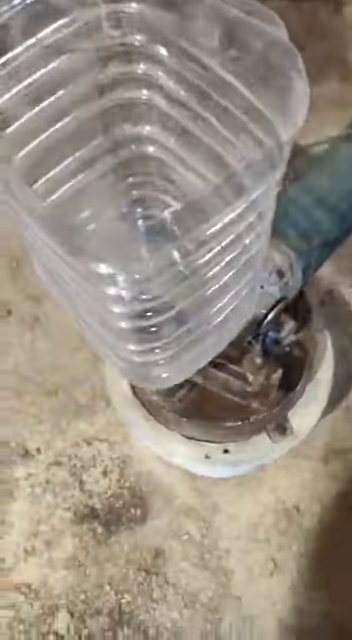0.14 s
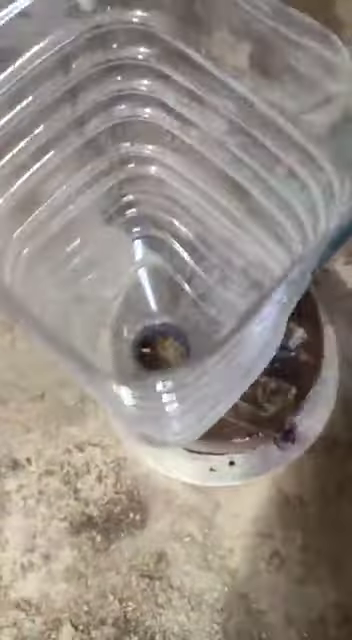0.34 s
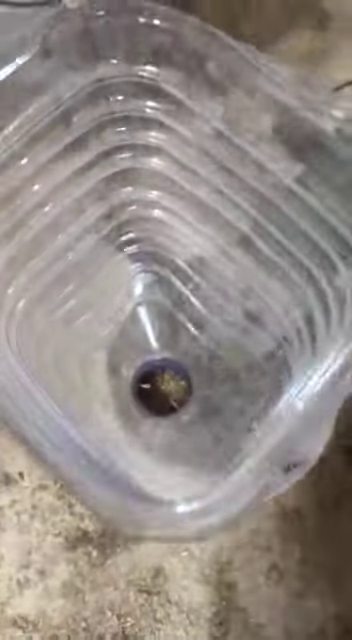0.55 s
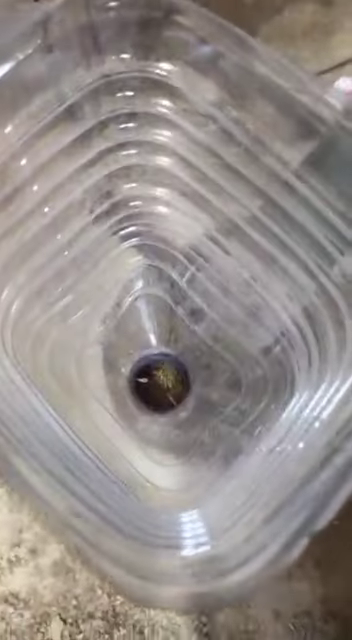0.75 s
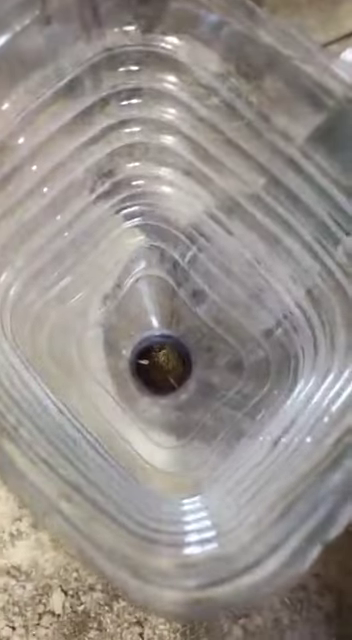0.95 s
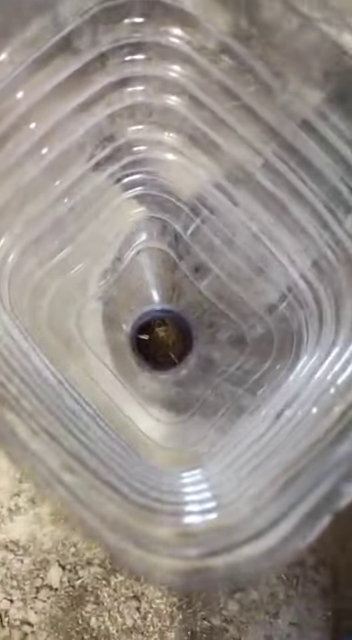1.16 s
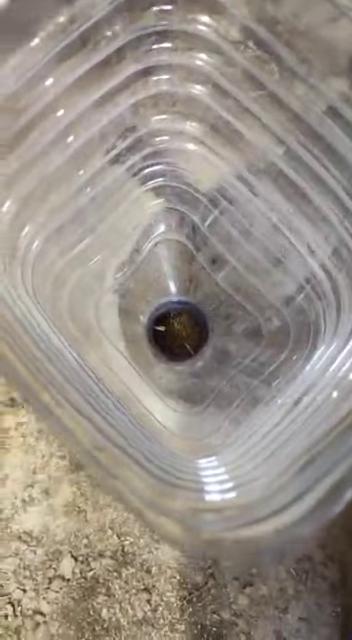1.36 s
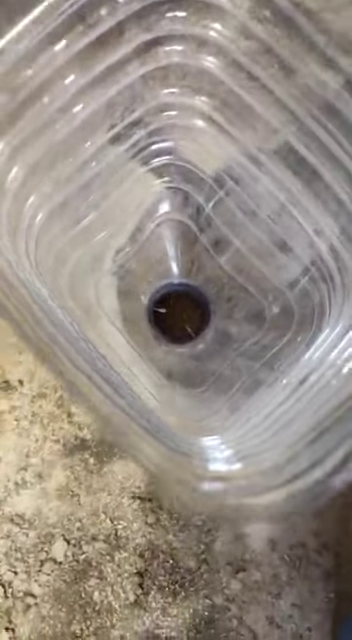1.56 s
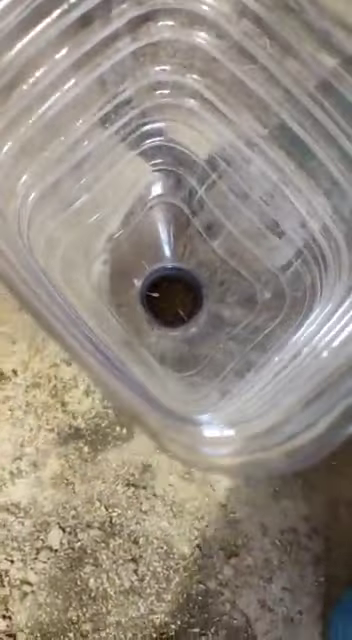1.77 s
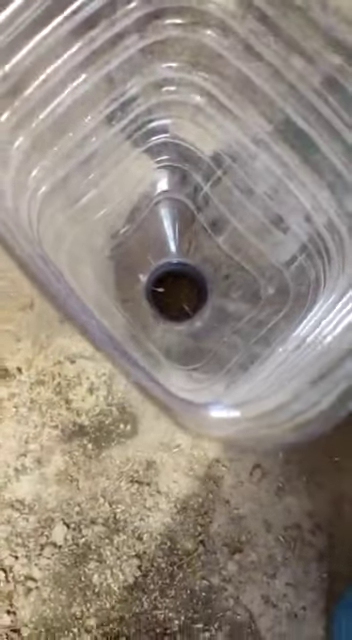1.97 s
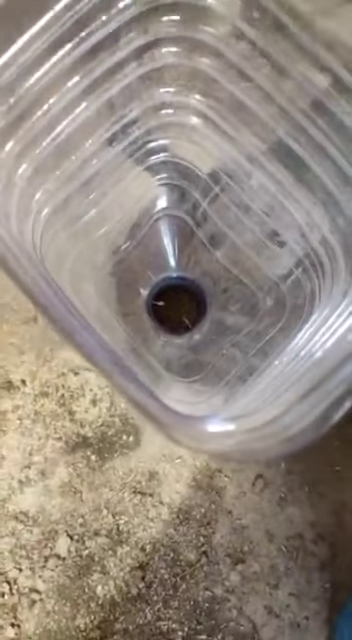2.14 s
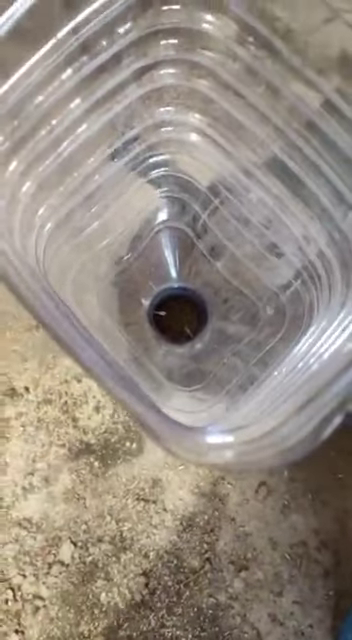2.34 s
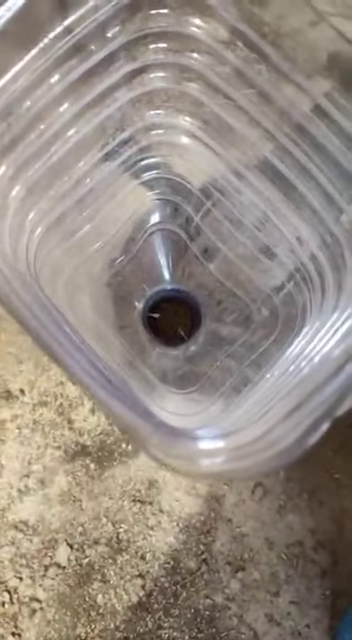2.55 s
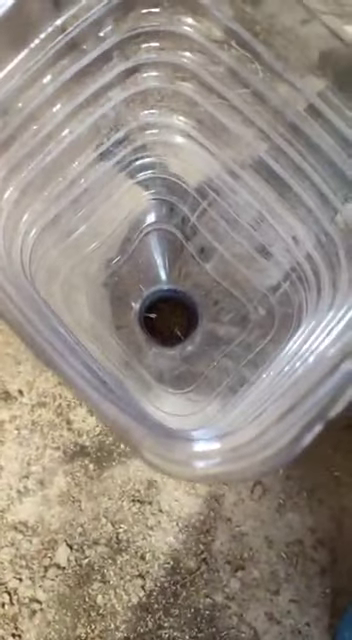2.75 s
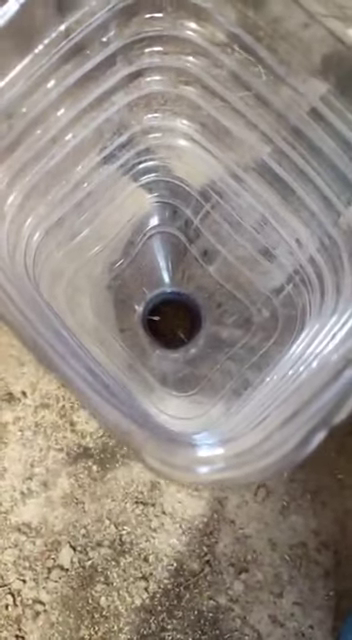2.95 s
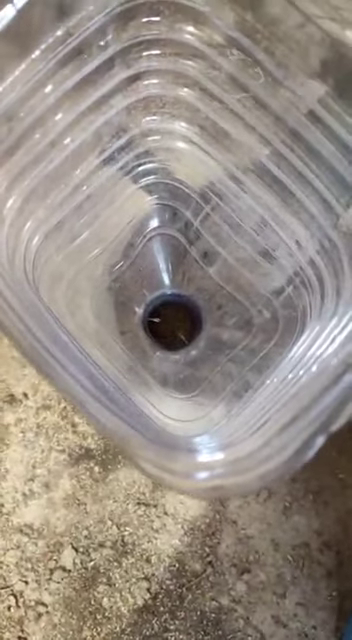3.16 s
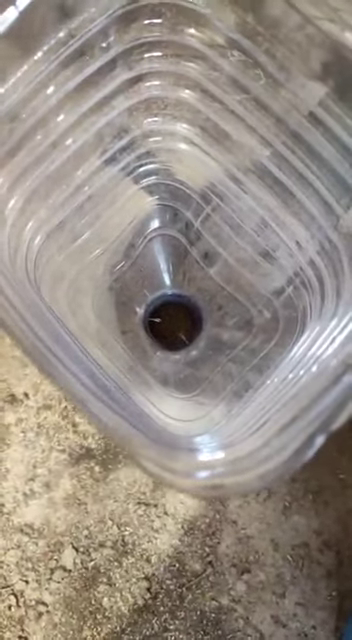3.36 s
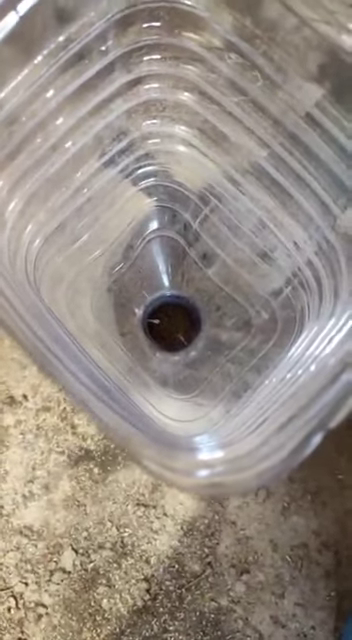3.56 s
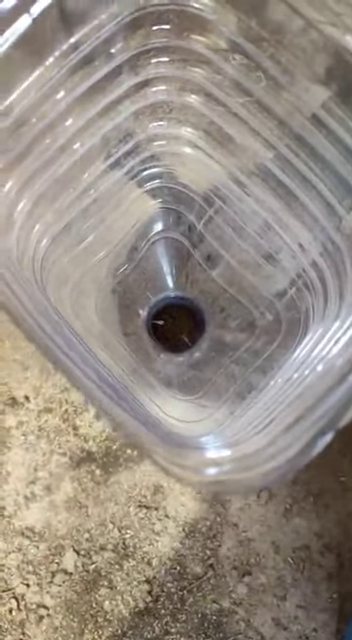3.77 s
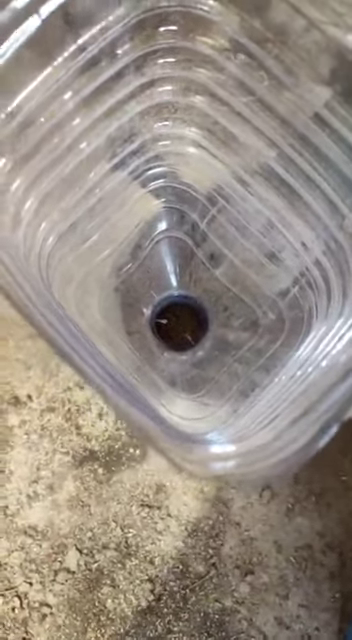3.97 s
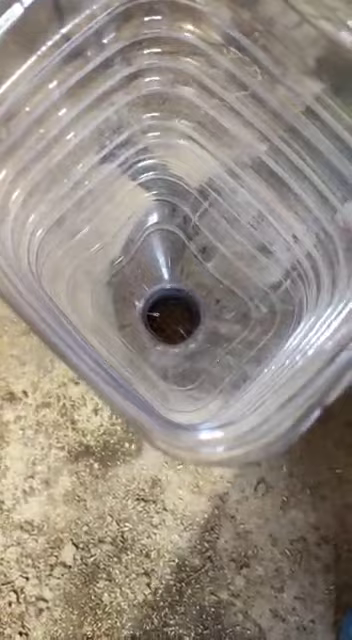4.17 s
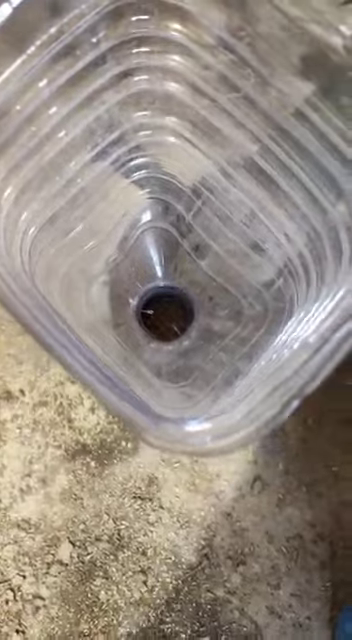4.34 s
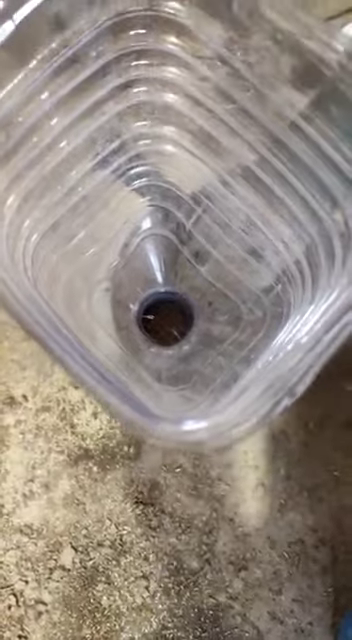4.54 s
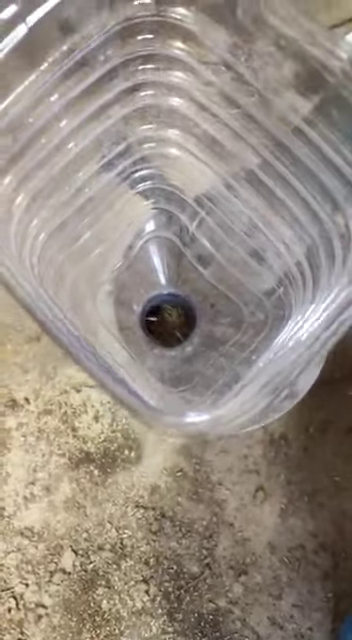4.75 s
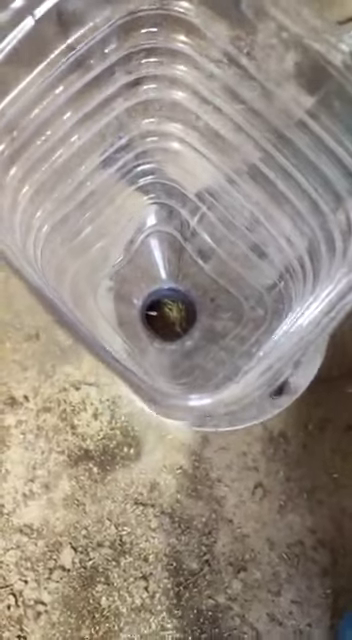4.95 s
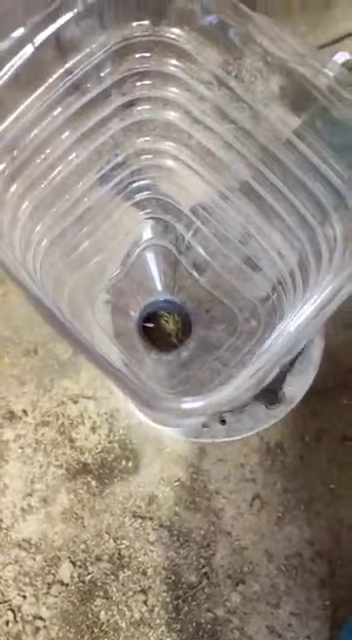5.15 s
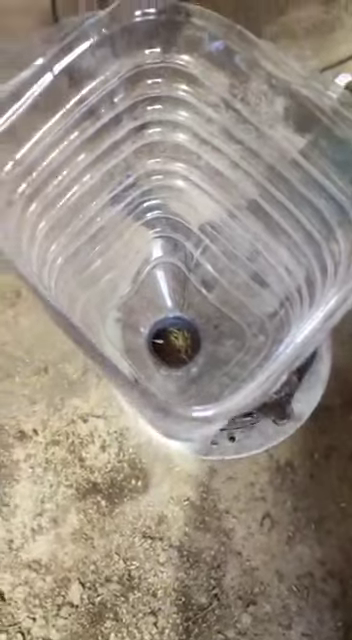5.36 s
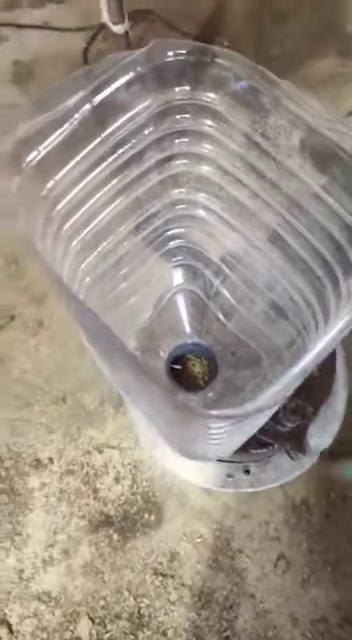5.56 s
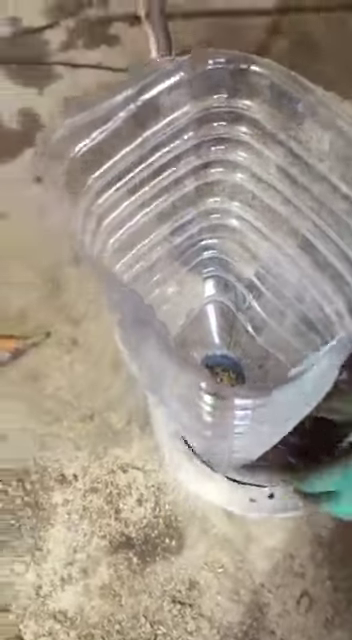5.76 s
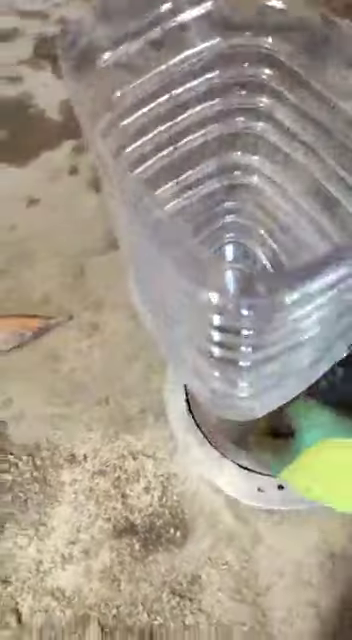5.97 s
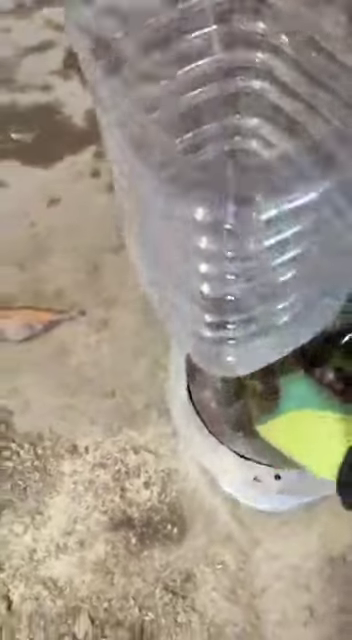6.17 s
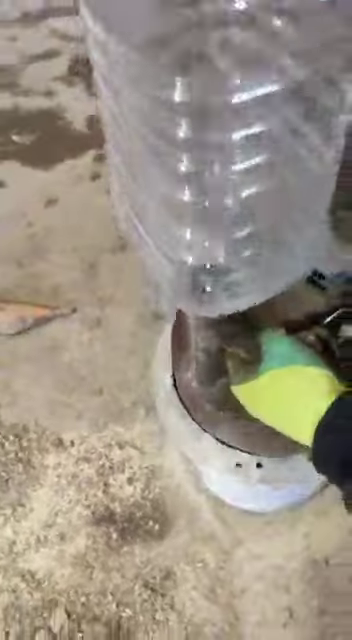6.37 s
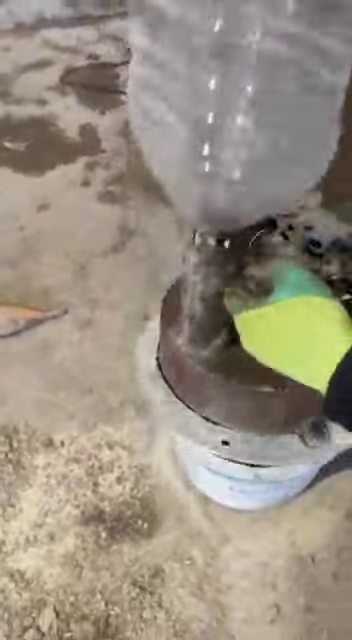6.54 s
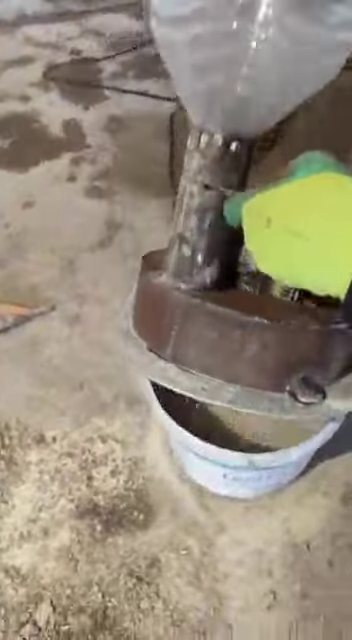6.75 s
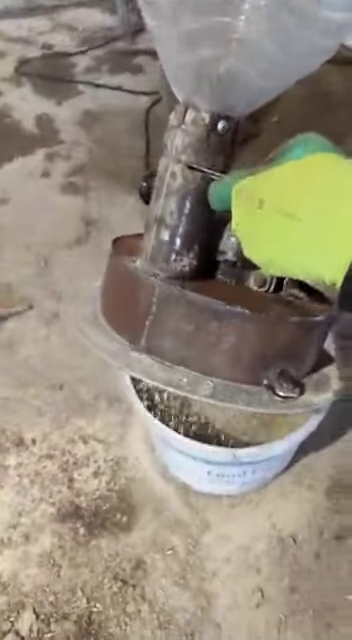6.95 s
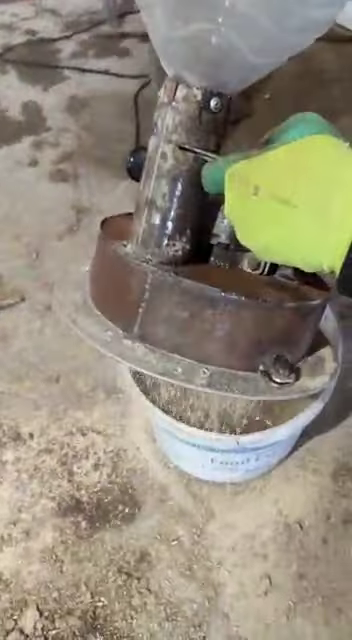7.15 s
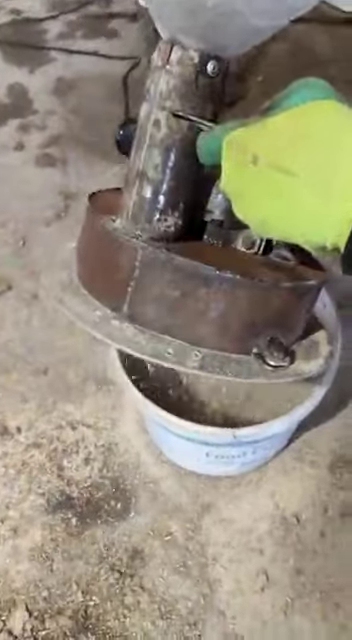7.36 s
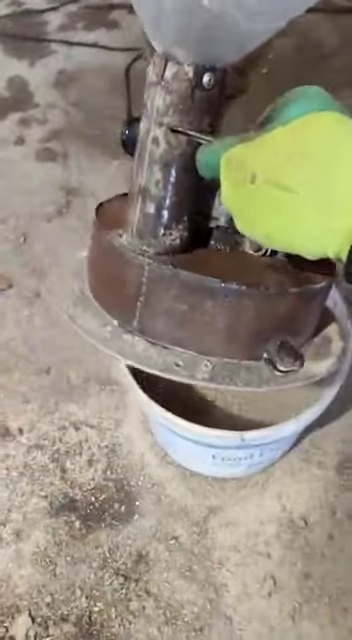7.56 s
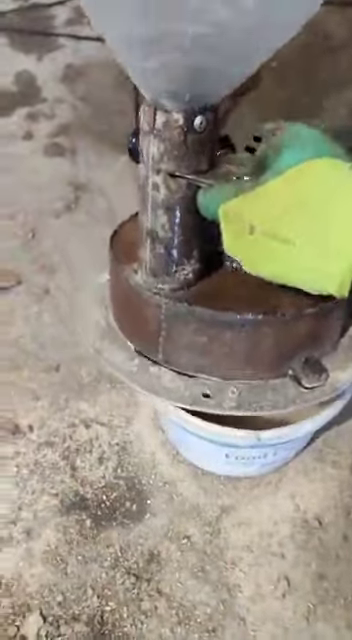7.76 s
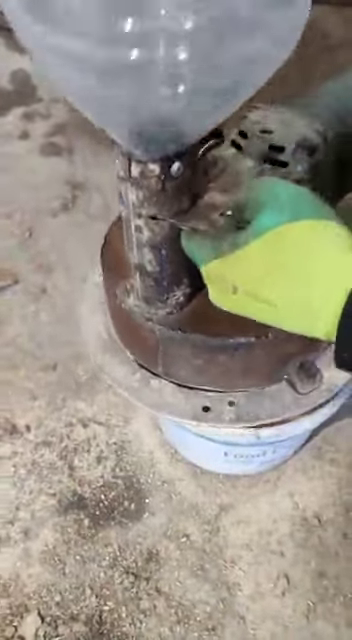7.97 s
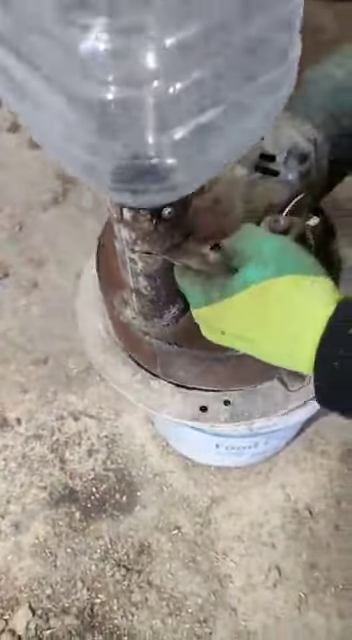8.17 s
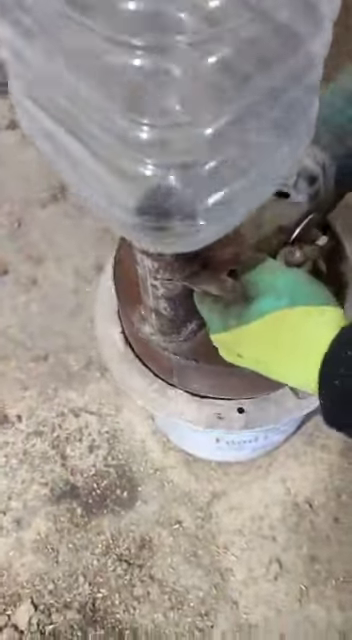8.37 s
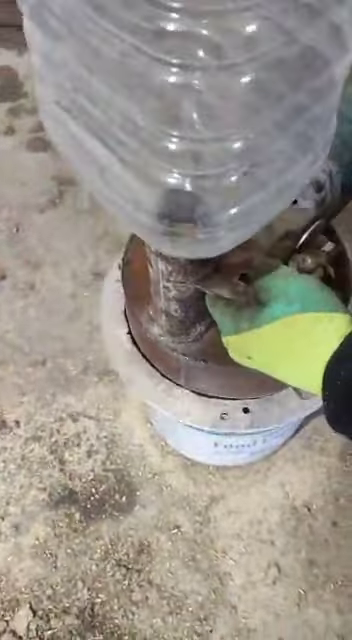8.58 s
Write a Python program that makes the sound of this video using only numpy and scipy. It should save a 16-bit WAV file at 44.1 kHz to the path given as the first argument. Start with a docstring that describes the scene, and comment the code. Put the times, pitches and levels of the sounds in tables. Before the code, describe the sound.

A loud, bright machine roar with sharp grain cracks and a slightly rising gear whine fills the first few seconds, recorded very near in stereo with short outdoor reflections. It slows through a falling rasp and rattle, then stops. Much softer handling follows: glove rubbing, light knocks, grit ticks, meal trickling and a faint rim squeak. A hollow plastic-and-steel thud with low floor weight ends it.

```python
"""In a concrete yard, a homemade grain crusher driven by an angle grinder runs close to a phone.
Beaters fling kernels against a steel drum, heard as random impacts through its resonances, over gear tones that
follow the spindle speed. Switched off, it coasts to a stop under air drag and bearing friction.
A glove scuffs and drags as filtered noise and a wavering tone, meal slides out as fine grains,
and the drum, set back on its bucket, knocks through bucket and floor modes over quiet yard air."""
import sys
import numpy as np
from scipy import signal
from scipy.fft import rfft, irfft
from scipy.io import wavfile
from scipy.ndimage import uniform_filter1d, minimum_filter1d

SR = 44100
rng = np.random.default_rng(int(sys.argv[2]) if len(sys.argv) > 2 else 0)


def bounce(signal):
    """Save signal as a 16-bit WAV file at the path given by the first command-line argument."""
    frames = np.transpose(np.atleast_2d(signal))
    limited = np.clip(frames, -1, 1)
    pcm = np.round(limited * 32767).astype(np.int16)
    wavfile.write(sys.argv[1], SR, pcm)


N = 379695
T = np.arange(N) / SR
FREQ = np.maximum(np.fft.rfftfreq(2 ** 19, 1 / SR), 1)

# spindle speed under power, creeping up until the cut at the last point: (time [s], speed [turns/s])
SPINDLE_SPEED = [(0, 110), (.6, 112.2), (1, 113.2), (1.5, 114), (2.25, 115.5), (3.82, 117.8)]
# below this speed [turns/s] the kernels drop out of the whirl
STALL_SPEED = 34.6
PORT_LAG = 14  # direct sound reaches the left port this much later [samples]


def crusher(speed, clump_db):
    """Kernels struck by the beaters crack against the steel; slower beaters hit more softly."""
    # kernels and meal rolling round the wall: (time [s], level [dB])
    tumble_levels = [(0, -32), (.7, -35), (2, -38.5), (3.8, -37), (4.3, -36), (4.7, -29.5), (5.2, -31.5)]
    # treble as the phone moves over the hopper and away again: (time [s], level [dB])
    treble_levels = [(0, 2), (.7, -2), (4.8, -2.5), (5.4, 2.5)]
    # outline of a kernel's crack: (frequency [Hz], level [dB])
    crack_outline = [(300, -26.5), (660, -15.5), (790, -8.5), (1200, -8.5), (1700, -1.5), (2400, 2),
                     (3300, -2.5), (3750, 0.5), (4150, -4.5), (4750, -0.5), (5200, -6), (5700, -4),
                     (6700, -2.5), (7450, -18), (8200, -15), (11000, -14.5), (13200, -27), (16000, -48)]
    # steel lid modes: (frequency [Hz], width [Hz], level [dB])
    steel_modes = [(1556, 84, -2.5), (2220, 170, -1), (2576, 100, 2), (2930, 160, -8.5), (3240, 79, -1),
                   (3470, 300, -4), (4420, 150, -7), (4760, 190, -6), (5640, 99, -3.5), (5970, 150, -3),
                   (6380, 370, -10)]
    # steel wall and lid modes: (frequency [Hz], width [Hz], level [dB])
    wall_modes = [(778, 32, -0.5), (810, 43, -2.5), (838, 60, -1), (957, 21, -4), (1019, 28, 6),
                  (1060, 39, 2.5), (1158, 93, -1), (1405, 93, -1.5), (1570, 120, 2.5), (1803, 330, -1),
                  (2230, 440, -2.5)]
    # whole kernels shattering on the steel: (time [s], level [dB], decay [s])
    shatter_times = [(.274, -10, .002), (.3406, -12, .003), (.413, -22, .003), (.4623, -14, .003),
                     (.8175, -10, .003), (1.2461, -6.5, .003), (2.0423, -14, .004), (2.579, -11.5, .003),
                     (2.6728, -14.5, .003), (2.7556, -11.5, .003), (2.8464, -11, .004),
                     (3.3717, -18.5, .003), (3.5808, -13, .003), (3.7748, -16.5, .003), (4.0352, -18, .003),
                     (4.4902, -8, .003), (4.8105, -14, .003), (4.861, -13, .003), (5.051, -13.5, .005),
                     (5.218, -29, .004)]
    # lag of the left port for three sides of the drum: (lag [samples])
    side_lags = (12, 14, 16)
    strike_db, ping_db, treble_hz = -23, -26.5, 8000
    # each sound weakens with its own power of the speed
    strike_law, tumble_law, crack_law, ring_law = 1.96, 0.98, 0.42, 0.59

    tumble_db, = curves(tumble_levels)
    treble_db, = curves(treble_levels)
    stalling = below(speed, STALL_SPEED, strike_law)
    striking = undb(strike_db + clump_db) * stalling
    rolling = undb(tumble_db) * below(speed, STALL_SPEED, tumble_law)
    full_speed = SPINDLE_SPEED[1][1]
    force = below(speed, full_speed, crack_law)

    # the kernels whirl round in clumps, a little slower than the beaters, and spread out as they slow
    whirl = np.cumsum(speed * (.8 + 0.0959 * walk(12))) / SR
    bunching_db = 2.6 * force * np.cos(2 * np.pi * whirl)
    turn = 2 * np.pi * np.cumsum(speed) / SR
    beaters_db = 1.2 * np.cos(2 * turn) + 1.4 * np.cos(4 * turn)
    uneven_db = 1.0 * walk(35) + 1.0 * walk(150)
    feed = (speed > 0) * undb(bunching_db + beaters_db + uneven_db)

    crack = colour(crack_outline) * low_cut(92, order=2)
    steel = modes(steel_modes) * low_cut(1500, order=3)
    wall = modes(wall_modes) * low_cut(700, order=8) / (1 + (FREQ / 3000) ** 4)
    # a longer contact loses the treble
    soft = crack / np.sqrt(1 + (FREQ / 1000) ** 2) * low_cut(780, order=4)

    out = 0
    for lag in side_lags:  # each side of the drum reaches the phone by its own paths
        strikes = grains(330, spread_db=4.5) * feed
        ring = unit(through(grains(900, spread_db=2.5) * feed, steel)) * undb(-4.0)
        hard = unit(through(strikes, crack)) * undb(0.55) * force
        hard = hard + ring * below(speed, full_speed, ring_law)
        dull = unit(through(grains(300, spread_db=5.5) * feed, soft)) * 2 * (1 - force)
        tumble = unit(through(strikes, wall)) * rolling
        out = out + yard((hard + dull) * striking + tumble, wet_db=4, t60=0.15, lag=lag)

    chips = pings(undb(ping_db + clump_db) * stalling * force ** 2)
    shatters = rung(rng.standard_normal(N) * snaps(shatter_times), crack * low_cut(300, order=3))
    out = out + yard(chips + shatters, wet_db=4.5, t60=0.07, lag=PORT_LAG)
    treble = through(out, low_cut(treble_hz, order=2))
    return out + treble * (undb(treble_db) - 1)


def pings(strength):
    """Chips hit the wall at random moments, each ringing it briefly at its own pitch."""
    rate, decay_s = 130, 0.0036  # chips a second, ring decay
    middle_hz, spread_octaves = 3008, .33
    gap, pitch, size = rng.random((1200, 3)).T
    start = (np.cumsum(.3 + 1.4 * gap) / rate * SR).astype(int)
    # an even draw becomes a bell-shaped scatter of pitch
    scatter = np.clip(np.log((pitch + 1e-6) / (1 - pitch)) / 1.7, -2.5, 3.5)
    hz = middle_hz * 2 ** (spread_octaves * scatter)
    t = T[:1024]
    rings = undb(9 * size)[:, None] * np.sin(2 * np.pi * hz[:, None] * t) * np.exp(-t / decay_s)
    places = start[:, None] + np.arange(len(t))
    out = np.bincount(places.ravel(), rings.ravel(), N)[:N]
    level = np.sqrt(np.mean(out[:N // 2] ** 2))
    return through(out / level * strength, low_cut(900, order=3))


def clumps():
    """Uneven feed: extra dB of the strikes as clumps drop into the beaters, less in the gaps."""
    # clumps and gaps: (time [s], extra strike level [dB])
    clump_times = [(0.769, 0.5), (1.03, -2), (1.3, 0.5), (1.77, -0.5), (2.06, 1), (2.18, -1), (2.33, -1.5),
                   (2.74, 2), (3.49, 1.5), (4.75, 2.5), (5.09, 3), (5.21, -1)]
    clump_s = 0.038  # half-width of the bell-shaped change
    s, db = np.transpose(clump_times)
    return db @ np.exp(-.5 * ((T - s[:, None]) / clump_s) ** 2)


def drum(speed):
    """Kernels shake drum and frame; the beaters' push, twice a turn, sweeps down through the frame's resonance."""
    # drum and hopper modes: (frequency [Hz], width [Hz], level [dB])
    drum_modes = [(226, 21, -5), (277.4, 9, -2), (327.3, 13, 8.5), (352.6, 36, 1.5), (387.2, 14, 0.5),
                  (406.4, 9.8, 7.5), (438, 7.7, -4), (477, 49, -16), (582, 61, -8.5)]
    # frame mode: (frequency [Hz], width [Hz], level [dB])
    frame_modes = [(180.2, 5.5, -1.5)]
    # packed grain thumping the drum: (time [s], level [dB])
    thump_times = [(.738, -12.5), (.91, -18.5), (.999, -16.5), (1.106, -22.5), (1.286, -13), (1.408, -16.5),
                   (1.625, -17.5), (1.781, -13.5), (2.054, -17), (2.147, -14), (2.389, -15.5),
                   (2.523, -21.5), (2.71, -15.5), (2.939, -18.5), (3.344, -21), (4.73, -14.5), (5.065, -16)]
    # low frame and drum tones that swell up now and then, mostly as the machine slows:
    # (frequency [Hz], start [s], level [dB], rise [s], hold [s], fade [s])
    drone_swells = [(178.5, 3, -38.5, .05, .08, .04), (272, 4.3, -34, 0.091, .12, .04),
                    (208, 4.3, -36.5, .03, 0.046, 0.025), (178.4, 4.5, -36.5, 0.041, 0.18, 0.032),
                    (274, 4.69, -30.5, 0.072, 0.21, .05), (176, 5.23, -41, 0.036, 0.069, 0.067),
                    (273, 5.2, -45.5, .05, 0.13, 0.043)]
    boom_db, frame_db, beater_db, shell_push_db = -25, -44.5, -31.5, -6
    empty_db, fill_s = -2.5, 0.41  # the boom starts this much weaker until the drum has filled
    slow_boom_db, slow_frame_db = -3, 5  # slow beaters boom less on the drum and rock the frame more

    slow = 1 - speed / speed.max()
    milling = below(speed, STALL_SPEED, 0.84)
    boom_level = boom_db + empty_db * np.maximum(1 - T / fill_s, 0) + slow_boom_db * slow
    frame_level = frame_db + slow_frame_db * slow
    shell = modes(drum_modes) * low_cut(185, order=7) / (1 + (FREQ / 650) ** 4)
    frame = modes(frame_modes) * low_cut(160, order=12) / (1 + (FREQ / 260) ** 4)

    boom = rung(grains(800, spread_db=3.5) * milling * undb(boom_level), shell)
    boom += through(blows(thump_times), shell / np.abs(irfft(shell)).max())
    rattle = rung(grains(3000, spread_db=4.5) * milling * undb(frame_level), frame)
    angle = 2 * np.pi * np.cumsum(speed * (1 + 0.0087 * walk(40))) / SR
    beat = np.sin(2 * angle) * undb(beater_db + 2 * walk(27))
    push = through(beat, frame + shell * undb(shell_push_db)) * np.sqrt(2)
    body = boom + rattle + push + tones(drone_swells, waver_db=0.0)
    sides = undb([[-2.2], [2.6]])  # left, right
    return yard(body, wet_db=-10.0, t60=0.33, lag=PORT_LAG) * sides


def gears(speed):
    """Teeth whine at multiples of the spindle speed; their chatter spreads into a rasp that falls with it."""
    # gear load: (time [s], tooth whine level [dB], motor tone level [dB])
    load_levels = [(0, -27, -35.5), (.3, -22.5, -43.5), (.7, -26, -40), (1, -31.5, -43), (1.4, -29.5, -38),
                   (2.1, -27, -37.5), (2.35, -26.5, -49.5), (3.4, -32.5, -49), (3.8, -31.5, -49)]
    # tooth tones: (multiple of the spindle speed)
    tooth_orders = (23, 24, 26, 28, 51)
    # gear case resonances that pick out passing gear tones: (frequency [Hz], width [Hz], level [dB])
    case_modes = [(1012, 50, -4), (2600, 45, 2), (2700, 35, 0.5), (2760, 40, -7), (2925, 22, -3.5),
                  (2995, 35, -3), (3060, 30, -5), (3256, 20, -2), (3298, 15, -1), (5825, 60, -11)]
    # harder rattle as the feed starts and as the power is cut:
    # (start [s], level [dB], rise [s], hold [s], fade [s])
    rattle_swells = [(.08, -22.5, 0.23, 0.059, 0.096), (3.82, -21.5, 0.24, 0.18, 0.13)]
    mesh_speed = 49  # turns/s, below which the teeth fade
    whine_law, rasp_law, rotor_law = 4, 2.9, 8  # powers of the speed
    rasp_db, case_ring_db = -23.5, 0.5

    whine_db, rotor_db = curves(load_levels)
    angle = 2 * np.pi * np.cumsum(speed * (1 + 0.00095 * walk(40))) / SR
    teeth = sum(undb(1.9 * walk(7.7) + 3.2 * walk(70)) * np.sin(k * angle) for k in tooth_orders)
    # a lower tooth tone, smeared by backlash
    teeth = teeth + 1.4 * np.sin(9 * angle + 2.5 * walk(700))
    case_response = modes(case_modes)
    whine = unit(through(teeth, case_response)) * undb(whine_db) * below(speed, mesh_speed, whine_law)
    rotor = np.sqrt(2) * np.sin(6 * angle + .7 * walk(14)) * undb(rotor_db + 2.5 * walk(12))
    rotor = rotor * below(speed, SPINDLE_SPEED[0][1], rotor_law)

    # backlash makes the teeth rattle in sharp bursts of uneven strength, a little less than once a turn
    cycle = np.cumsum(speed * (.78 + .17 * walk(90))) / SR
    strength = undb(3.2 * np.clip(rng.standard_normal(N), -2, 1.5))[cycle.astype(int)]
    bursts = strength * (.2 + np.exp(-(cycle % 1) / .3)) * undb(1.6 * walk(9))
    chatter = through(rng.standard_normal((2, 2, N)), 1 / (1 + (FREQ / 480) ** 4))
    chatter = (chatter + .3 * chatter[:, ::-1]) * bursts  # the two ports share part of it
    # the noise is carried up to a band whose centre wanders around 25 times the spindle speed
    centre = 25 * angle + 2 * np.pi * np.cumsum(speed * 1.3 * walk(10)) / SR
    rasp = chatter[0] * np.cos(centre) + chatter[1] * np.sin(centre)
    rasp = unit(rasp) * (undb(rasp_db) + swells(rattle_swells)) * below(speed, mesh_speed, rasp_law)
    case = low_cut(850, order=7) * (1 + undb(case_ring_db) * case_response) * undb(-4.0)

    whine = yard(whine, wet_db=-7.5, t60=0.099, lag=PORT_LAG)
    rotor = yard(rotor, wet_db=-17, t60=0.12, lag=PORT_LAG)
    return whine + rotor + through(rasp, case)


def spindle():
    """Turns per second: driven until the power is cut, then braked by air drag and bearing friction."""
    friction = 55.2  # turns/s lost each second
    drag_speed = 117.8  # turns/s at which air drag equals the friction
    driven, = curves(SPINDLE_SPEED)
    cut_s, top = SPINDLE_SPEED[-1]
    left = np.arctan(top / drag_speed) - friction / drag_speed * np.maximum(T - cut_s, 0)
    return np.minimum(driven, drag_speed * np.tan(np.maximum(left, 0)))


def below(speed, knee, law):
    """Gain 1 above the knee speed, falling as a power of the speed under it."""
    return np.minimum(speed / knee, 1) ** law


def knock():
    """The drum lands on the plastic bucket with a dull blow and rebounds; the bucket rings on and the floor thumps."""
    # the drum knocking and rebounding on the bucket: (time [s], level [dB])
    knock_times = [(6.5105, -22), (6.554, -21), (6.5605, -21), (6.574, -23), (6.591, -24), (6.602, -24),
                   (6.639, -26), (6.666, -26), (8.224, -23), (8.453, -23), (8.457, 3.5), (8.46, -4.5),
                   (8.486, -9), (8.499, -12), (8.522, -10), (8.589, -21)]
    # outline of the blow: (frequency [Hz], level [dB])
    thud_outline = [(25, -15), (55, -5.5), (110, -30.5), (200, -5.5), (320, 6), (420, 3.5), (520, 0),
                    (700, 2.5), (1200, 4), (1700, -18.5), (3200, -16), (4500, -28), (6500, -24),
                    (10000, -44), (15000, -47)]
    # bucket modes: (frequency [Hz], width [Hz], level [dB])
    bucket_modes = [(234, 23, -5.5), (291, 14, -3.5), (358, 12, -1.5), (414, 12, -3.5), (475, 14, -4),
                    (538, 16, -6.5), (628, 20, -12), (690, 20, -16), (985, 30, -16.5)]
    # the floor under the bucket: (frequency [Hz], width [Hz], level [dB])
    floor_modes = [(57, 9, 8)]
    hits = blows(knock_times)
    blow = through(hits ** 1.35, colour(thud_outline))  # grows faster with force than the ring does
    body = through(blow, 1 / (1 + 1j * FREQ / 550) ** 3)  # the low part lingers in the yard
    ring = through(hits, modes(bucket_modes) / (1 + (FREQ / 1700) ** 2)) * undb(17.0)
    crack = yard(blow, wet_db=-3, t60=0.25) * undb(-3)
    body = yard(body * undb(-1.0), wet_db=12, t60=0.36)
    ring = yard(ring, wet_db=-1.5, t60=0.4)
    return crack + body + ring + through(hits, modes(floor_modes))


def handling():
    """Meal slides, the glove scuffs and drags, the drum rubs on the rim and grit ticks."""
    # meal sliding out of the drum: (start [s], level [dB], rise [s], hold [s], fade [s])
    pour_swells = [(5.3, -60.5, 0.11, 0.31, 0.31), (6.15, -63, 0.12, 0.14, 0.19),
                   (6.73, -62, 0.052, 0.16, .1), (6.99, -43.5, 0.14, 0.16, 0.067),
                   (7.37, -53, .02, 0.081, 0.12), (7.62, -59.5, .07, 0.1, 0.063)]
    # outline of sliding meal: (frequency [Hz], level [dB])
    meal_outline = [(180, -57), (300, -26), (553, -25), (720, -28), (849, -18.5), (1810, -5), (2560, -9.5),
                    (2980, -4), (4140, -11.5), (6790, -10), (7370, -20), (15500, -18)]
    # the drum scraping on the bucket rim: (start [s], level [dB], rise [s], hold [s], fade [s])
    scrape_swells = [(6.2, -64, 0.14, 0.22, .25), (6.54, -60, 0.018, .03, 0.051),
                     (7.89, -64.5, 0.03, .02, .2)]
    # scrape modes: (frequency [Hz], width [Hz], level [dB])
    scrape_modes = [(294, 70, 6), (440, 110, -2), (630, 90, -4), (1010, 120, 2), (1380, 170, -3)]
    # the rim squeaking: (start [s], level [dB], rise [s], hold [s], fade [s])
    squeak_swells = [(6.53, -71, .04, .1, .15), (7.895, -59, 0.027, 0.13, .11)]
    # the glove dragging on the feed tube: (start [s], level [dB], rise [s], hold [s], fade [s])
    drag_swells = [(6.13, -62, 0.056, .02, 0.032), (6.56, -62, .04, .06, .04), (6.71, -59.5, .04, .08, .04),
                   (6.87, -61.5, .04, .12, 0.071)]
    # glove scuffs: (start [s], level [dB], rise [s], hold [s], fade [s])
    scuff_swells = [(5.8345, -42, .0015, .003, 0.021), (6.33, -45, 0.011, .008, 0.017)]
    # outline of a scuff: (frequency [Hz], level [dB])
    scuff_outline = [(100, -7), (400, -12), (900, 0), (1500, -1), (2800, -1), (4500, -3), (6500, -6),
                     (8000, -14), (15000, -29)]
    # small ticks of grit and metal: (time [s], level [dB], decay [s])
    tick_times = [(6.437, -40, .002), (6.478, -56, .003), (6.5095, -44, 0.0016), (6.641, -54, 0.0045),
                  (6.665, -53, .0015), (6.9635, -33.5, 0.0012), (7.001, -42, .003), (7.038, -40, .003),
                  (7.09, -39, .002), (7.386, -36, 0.0048), (7.413, -40, .003), (7.505, -38, .003),
                  (7.623, -40, 0.0018), (7.703, -45.5, .004), (7.792, -43, .003), (7.849, -44, .002),
                  (7.915, -50, .004), (8.151, -48, .003)]
    # outline of a tick: (frequency [Hz], level [dB])
    tick_outline = [(300, -31), (1200, -8), (2200, 0.5), (4000, -6), (6300, -4), (8000, -16), (15000, -18)]

    # many fine grains and a few coarse ones
    trickle = grains(7000, spread_db=7.0) + .7 * grains(130, spread_db=5)
    trickle = trickle * undb(1.5 * walk(45))
    slide = colour(meal_outline) * low_cut(406, order=2) / (1 + (FREQ / 13000) ** 8)
    meal = unit(through(trickle, slide)) * swells(pour_swells)
    scrape = modes(scrape_modes) * low_cut(200, order=3)
    rub = unit(through(grains(1000, spread_db=9), scrape)) * swells(scrape_swells)
    rub += squeak() * swells(squeak_swells)
    rub += drag() * swells(drag_swells)
    scuffs = unit(through(rng.standard_normal(N), colour(scuff_outline))) * swells(scuff_swells)
    ticks = unit(through(rng.standard_normal(N), colour(tick_outline))) * snaps(tick_times)
    out = yard(meal + rub + scuffs, wet_db=6.5, t60=0.34) + yard(ticks, wet_db=2.5, t60=0.49)
    return out * undb([[1], [-1]])  # left, right


def squeak():
    """The rim sticks and slips at a shifting pitch; each partial is rough in its own way."""
    # pitch as the rim slides: (time [s], pitch [Hz])
    squeak_pitch = [(6.55, 734), (7.91, 650), (7.97, 709), (8.06, 695), (8.14, 718)]
    # partials: (multiple of the pitch, level [dB])
    squeak_partials = [(1, 1.5), (2, -4), (2.93, -1), (4.08, -4)]
    pitch, = curves(squeak_pitch)
    out = 0
    for multiple, db in squeak_partials:
        hz = multiple * pitch + 18 * walk(30) + 115 * walk(600)
        out = out + undb(db + 2.4 * walk(80)) * np.sin(2 * np.pi * np.cumsum(hz) / SR)
    return unit(out)


def drag():
    """The glove catches and slips unevenly at a wavering pitch."""
    hz = 1440 + 45 * walk(16) + 180 * walk(900)
    roughness = undb(3.5 * walk(45) + 3 * walk(300))
    return unit(np.sin(2 * np.pi * np.cumsum(hz) / SR) * roughness)


def ambience():
    """Quiet outdoor air as coloured noise, and a low hum."""
    # outline of the yard air: (frequency [Hz], level [dB])
    air_outline = [(25, -14), (50, -11), (110, -13), (220, -10), (400, -10), (700, -11), (1600, -17.5),
                   (2900, -19), (3900, -24), (6500, -28.5), (8500, -31), (15500, -44)]
    # faint low hums about an octave apart:
    # (frequency [Hz], start [s], level [dB], rise [s], hold [s], fade [s])
    hum_swells = [(76, 5.83, -71, .12, 1.9, .18), (150, 5.8, -75, 2.22, 0.25, .08)]
    air = unit(through(rng.standard_normal(N), colour(air_outline))) * undb(-64 + .7 * walk(4.5))
    return yard(air, wet_db=-0.5, t60=0.29) + tones(hum_swells, waver_db=3.0)


def yard(x, wet_db, t60, lag=0):
    """Direct sound, later at the left port, plus scattered echoes unlike at each port that shift as the phone wanders."""
    wander = .45  # radians per second
    t = T[:SR // 2]
    tail = rng.standard_normal((4, len(t))) * np.exp(-np.log(1000) * t / t60) * (t > .002)
    tail /= np.sqrt(np.sum(tail ** 2, axis=1, keepdims=True))
    echoes = signal.oaconvolve(x[None], tail, axes=1)[:, :N]
    echoes = echoes[:2] * np.cos(wander * T) + echoes[2:] * np.sin(wander * T)
    direct = np.array([np.pad(x, (lag, 0))[:N], x])
    wet = undb(wet_db)
    return (direct + wet * echoes) / np.sqrt(1 + wet ** 2)


def undb(db):
    """Decibels to gain."""
    return 10 ** (np.asarray(db) / 20)


def unit(x):
    """Scale to rms 1."""
    return x / np.sqrt(np.mean(x ** 2))


def curves(table):
    """Each column of a table joined by straight lines in time."""
    s, *columns = np.transpose(table)
    return [np.interp(T, s, c) for c in columns]


def through(x, response):
    """Pass a sound through a frequency response."""
    return irfft(rfft(x, 2 * len(FREQ) - 2) * response)[..., :N]


def rung(force, response):
    """A body rung by a noisy force of rms 1 gives about rms 1, and rings on when the force stops."""
    return through(force, response / np.sqrt(np.mean(np.abs(response) ** 2)))


def colour(points):
    """Causal (minimum-phase) response with the given (Hz, dB) outline, by folding its cepstrum."""
    hz, db = np.transpose(points)
    cepstrum = irfft(np.log(undb(np.interp(np.log(FREQ), np.log(hz), db))))
    cepstrum[1:len(FREQ) - 1] *= 2
    cepstrum[len(FREQ):] = 0
    return np.exp(rfft(cepstrum))


def modes(table):
    """Response of a set of resonances."""
    return sum(undb(db) / (1 + 1j * (FREQ ** 2 - hz ** 2) / (FREQ * width)) for hz, width, db in table)


def low_cut(hz, order):
    """Loss of bass, as below the size of a radiating body; a higher order is steeper."""
    return 1 / np.sqrt(1 + (hz / FREQ) ** (2 * order))


def walk(rate):
    """Smooth chance: random values, so many a second, joined by straight lines."""
    count = int(T[-1] * rate) + 2
    return 0.95 * np.interp(T * rate, np.arange(count), rng.standard_normal(count))


def grains(rate, spread_db):
    """Random impacts, so many a second, of uneven size and either sign."""
    size = undb(spread_db * np.clip(rng.standard_normal(N), -2, 2))
    return unit((rng.random(N) < rate / SR) * size * rng.choice([-1, 1], N))


def swells(table):
    """Summed envelopes of events that rise, hold and fade away."""
    out = 0
    for s, db, rise, hold, fade in table:
        falling = np.exp(-np.maximum(T - s - rise - hold, 0) / fade)
        out = out + undb(db) * np.clip((T - s) / rise, 0, 1) * falling
    return out


def tones(table, waver_db):
    """Low tones that swell, waver by the given amount and fade."""
    out = 0
    for hz, *shape in table:
        level = swells([shape]) * undb(waver_db * walk(17))
        out = out + np.sqrt(2) * level * np.sin(2 * np.pi * hz * T)
    return out


def snaps(table):
    """Summed envelopes of sudden cracks that die away."""
    return sum(undb(db) * (T >= s) * np.exp(-np.abs(T - s) / decay) for s, db, decay in table)


def blows(table):
    """One single-sample push for each (s, dB) row."""
    out = np.zeros(N)
    for s, db in table:
        out[int(s * SR)] += undb(db)
    return out


def scene():
    """The machine, its handling afterwards and the yard."""
    speed = spindle()
    machine = crusher(speed, clumps()) + drum(speed) + gears(speed)
    return machine + knock() + handling() + ambience()


def record(dry):
    """The phone's limiter ducks the sharpest peaks of both ports together, and the top is cut."""
    hold = 256  # samples
    room = np.minimum(1, .92 / (np.abs(dry).max(axis=0) + 1e-9))
    gain = uniform_filter1d(minimum_filter1d(room, 2 * hold), hold)
    top_cut = signal.ellip(10, .2, 80, 15750, fs=SR, output="sos")  # edge at 15750 Hz
    return signal.sosfilt(top_cut, dry * gain)


dry = scene()
out = record(dry)
bounce(out)
```